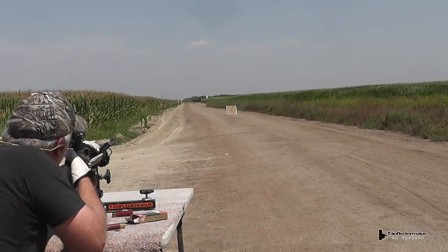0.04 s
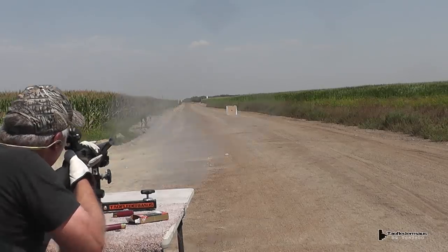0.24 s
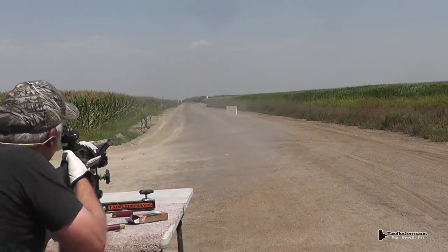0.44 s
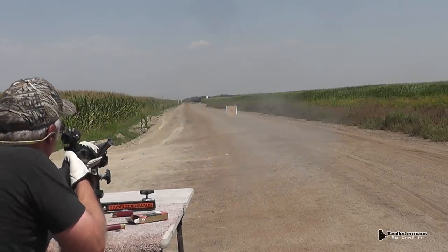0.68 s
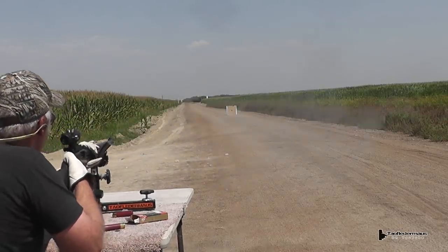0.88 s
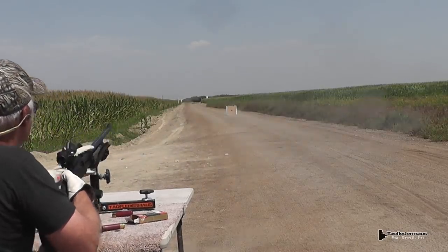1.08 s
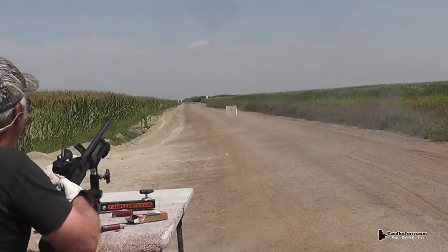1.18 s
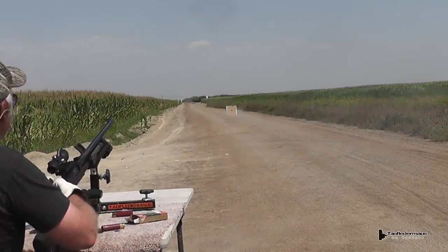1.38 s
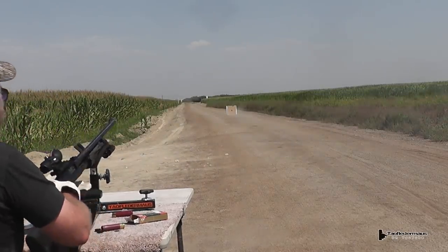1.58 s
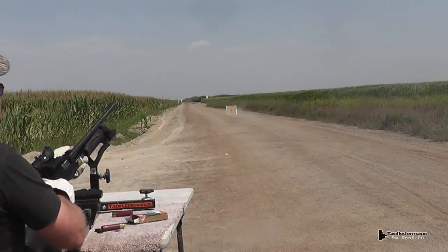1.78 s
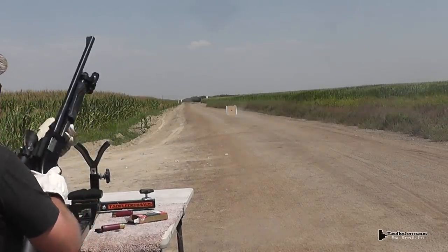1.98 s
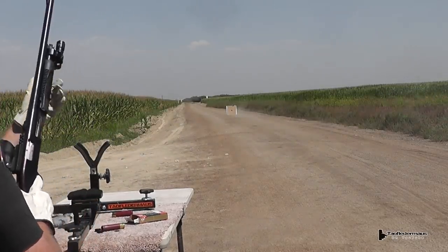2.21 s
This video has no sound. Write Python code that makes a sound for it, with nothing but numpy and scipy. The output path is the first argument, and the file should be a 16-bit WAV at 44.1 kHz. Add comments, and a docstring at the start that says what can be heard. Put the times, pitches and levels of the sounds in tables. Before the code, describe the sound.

After a brief quiet field hush, one violent gunshot bursts near the stereo microphones, scatters hiss and echoes over open farmland, fades as a dull roll, and ends with ringing action clacks and short gritty slides.

```python
"""Shotgun on a field road

A shotgun is fired once from a bench on a dirt road between fields, close to a stereo microphone pair.
The hammer knocks, crackle and a pressure thump follow, near things scatter clicks and two slaps return.
Shaped noise rolls home from ever farther away, duller as the air eats the treble; leaves scatter a hiss.
Then the gun is handled: ringing clacks and gritty slides, over a faint insect band and field hush."""
import sys
import numpy as np
from scipy import signal
from scipy.fft import rfft, irfft
from scipy.io import wavfile
from scipy.ndimage import uniform_filter1d

SR = 44100
rng = np.random.default_rng(int(sys.argv[2]) if len(sys.argv) > 2 else 0)


def dump(signal):
    """Clip the signal to [-1, 1] and save it as 16-bit WAV at the path in sys.argv[1]."""
    limited = np.clip(np.atleast_2d(signal).T, -1, 1)
    pcm = np.round(limited * 32767).astype(np.int16)
    wavfile.write(sys.argv[1], SR, pcm)


N = 99225  # samples

# Field hush, steady: pitch_hz, density_db (per Hz, relative)
HUSH_COLOUR = [(18, -43), (30, -36), (53, -18), (112, -2.5), (259, -3.5), (384, -13.5), (702, -17.5),
               (780, -7.5), (962, -21), (1320, -20.5), (3580, -34.5), (5740, -29), (6550, -29.5),
               (14800, -40), (16000, -48)]
# Stereo width of the hush: pitch_hz, side_minus_mid_db
HUSH_WIDTH = [(60, 5.5), (180, -3), (550, 1), (1650, -1.5), (4970, -42), (15000, 4)]
HUSH_DB = -49
INSECT_HZ, INSECT_HALF_WIDTH_HZ, INSECT_DB = 5750, 170, -72.5

# Hammer fall, then gun parts knocking: start_s, level_db (before CLACK_TRIM_DB), body_pitch_hz,
# steel_db (before STEEL_LIFT_DB), ring (multiple of the decay times)
CLACK_EVENTS = [(0.2017, -23, 1470, -16, 1), (1.038, -52, 900, 6, .15), (1.159, -56, 900, 3, 0.1),
                (1.179, -55, 900, 11, 0.13), (1.428, -41, 1320, -14, 0.66), (1.655, -52, 1600, 3, 0.28),
                (1.72, -40, 1410, -7, 0.6), (1.7235, -43, 1490, -6, 0.7), (1.736, -40, 1440, -10, .6),
                (1.746, -23.5, 975, -11.5, 1.1), (2.1408, -40.5, 1000, -14, 1),
                (2.174, -27, 2140, -12, 0.23)]
# Steel modes: pitch_hz, level_db (relative), t60_s (at ring 1)
STEEL_MODES = [(3100, -4, .006), (4600, 0, .007), (5700, -1, .007), (7200, -5, .005), (8600, 1, .006),
               (10000, -1, .005), (12500, -8, .003)]
CLACK_TRIM_DB, STEEL_LIFT_DB = -1, 9
BODY_T60_S, RATTLE_S = .022, .0028  # at ring 1

# Muzzle blast and its slap echoes: start_s, crackle_length_s, crackle_db, thump_db,
# dip_length_s, rebound (scale of the pressure rise after the dip)
BLAST_EVENTS = [(.2105, .0053, -11, -5.5, .0034, 1.5), (.338, .002, -21, -22, .0012, .8),
                (.4408, .0016, -13.5, -8, .0017, .55)]
# Crackle spectrum: pitch_hz, density_db (per Hz, relative)
CRACKLE_COLOUR = [(290, -42), (500, 4.5), (1510, -7.5), (2770, -32.5), (4730, -7), (10700, -6),
                  (13800, -15), (16000, -21)]
# Stereo width of the crackle: pitch_hz, side_minus_mid_db
CRACKLE_WIDTH = [(60, -14), (240, -9), (950, -4.5), (3770, -10.5), (15000, -21.5)]
THUMP_RIGHT_LAG_S, THUMP_LEFT_MINUS_RIGHT_DB = .0003, -0.5
REBOUND_RISE_DIPS, REBOUND_FADE_S = .17, .0017  # rise in dip lengths

# Treble scattered by leaves: time_s, level_db
HISS_LEVEL = [(.2156, -15.5), (.222, -23), (.25, -25), (.294, -36), (.332, -28.5), (.336, -30.5),
              (.366, -25), (.394, -30), (.415, -24), (.44, -24.5), (.452, -32.5), (.478, -40.5),
              (.5, -37.5), (.572, -41.5), (.666, -40), (.73, -44), (.752, -40), (.78, -44), (.85, -46),
              (.93, -55.5), (1.05, -56), (1.2, -61.5), (1.37, -65), (1.45, -63), (1.75, -69)]
# Leaf hiss spectrum: pitch_hz, density_db (per Hz, relative)
HISS_SPECTRUM = [(1060, -19), (1800, -1.5), (2430, -18.5), (3000, -7.5), (3510, -10.5), (4570, -4.5),
                 (5960, -9), (8830, -7.5), (13100, -16), (16000, -29)]
# Stereo width of the hiss: pitch_hz, side_minus_mid_db
HISS_WIDTH = [(60, -8), (150, -12), (380, -10), (950, -4), (2380, -16), (5980, -23), (15000, 0)]
# Colour drift of the hiss: pitch_hz, loss_db_per_s (relative to the other pitches)
HISS_FADE = [(2000, -10), (4500, -12), (8000, 5.5), (12000, 26.5), (16000, 70)]

# Scatter off bench, ground and crop edge: time_s, level_db
NEAR_LEVEL = [(.216, -16), (.236, -14.5), (.249, -15.5), (.252, -20), (.26, -21), (.266, -28), (.285, -40)]
# Near scatter spectrum: pitch_hz, density_db (per Hz, relative)
NEAR_SPECTRUM = [(35, -32), (60, -1.5), (474, -1), (649, -0.5), (948, -2.5), (1160, -11.5), (1550, -6.5),
                 (1700, -15), (2600, -24), (3380, -57), (5720, -120)]
NEAR_START_S, NEAR_RISE_S, NEAR_CLICKS_PER_S = .2205, .0029, 2700
NEAR_SPREAD_DB, NEAR_SHARED_POWER, NEAR_LEFT_MINUS_RIGHT_DB = 1, .42, 2.5

# Returning roll, low part: time_s, level_db
ROLL_LEVEL = [(.26, -29), (.292, -36.5), (.35, -32.5), (.39, -32.5), (.43, -28.5), (.47, -27.5),
              (.55, -22.5), (.62, -24.5), (.76, -23.5), (.93, -25), (1.1, -28.5), (1.2, -32), (1.34, -32),
              (1.4, -36.5), (1.6, -40.5), (1.8, -42), (2, -48), (2.25, -52)]
# Low roll spectrum: pitch_hz, density_db (per Hz, relative)
ROLL_SPECTRUM = [(29, -41), (50, -53), (225, -10), (411, -4.5), (546, -6), (690, -2.5), (950, -4.5),
                 (1240, -33), (2090, -120)]
# Stereo width of both roll parts: pitch_hz, side_minus_mid_db
ROLL_WIDTH = [(60, 19.5), (180, -19.5), (550, -13), (1650, -7), (4970, -16), (15000, -11)]
# Colour drift of the low roll: pitch_hz, loss_db_per_s (relative to the other pitches)
ROLL_FADE = [(60, 16), (150, -5.5), (280, 6), (600, 20.5), (1000, 45.5)]
# Returning roll, upper part: time_s, level_db
UPPER_LEVEL = [(.26, -42), (.29, -37.5), (.36, -34), (.395, -34.5), (.41, -24), (.44, -21.5), (.455, -31),
               (.5, -31), (.545, -27.5), (.6, -31.5), (.7, -38.5), (.8, -39.5), (.94, -50.5), (1.1, -53.5),
               (1.3, -61), (1.39, -61), (1.43, -58), (1.5, -63), (1.7, -71)]
# Upper roll spectrum: pitch_hz, density_db (per Hz, relative)
UPPER_SPECTRUM = [(500, -27.5), (750, -7.5), (1000, 2.7), (1400, 4), (1800, -14), (2400, -18), (3100, -28),
                  (5000, -58)]
# Colour drift of the upper roll: pitch_hz, loss_db_per_s (relative to the other pitches)
UPPER_FADE = [(800, 2.5), (1100, 9), (1500, 20), (2400, 2.5)]
LOSS_START_S, LOSS_SPAN_S = .37, 1.4  # the colour drifts only within this span

# Faint high rustle as the gun is lifted: start_s, length_s, level_db (before the arch)
RUSTLE_EVENT = (0.85, 0.44, -63.5)
# Rustle spectrum: pitch_hz, density_db (per Hz, relative)
RUSTLE_SPECTRUM = [(4000, -20), (7000, 4), (11000, 0.1), (14500, -7), (16000, -15)]
# Gun parts sliding: start_s, length_s, level_db (before the arch)
SLIDE_EVENTS = [(1.707, 0.071, -51), (1.761, .07, -57), (2.104, 0.069, -59.5), (2.161, 0.041, -50.5)]
# Slide spectrum: pitch_hz, density_db (per Hz, relative)
SLIDE_SPECTRUM = [(590, -33), (1000, 0.5), (2100, -11), (3300, -15.5), (4620, -9.5), (10800, -15),
                  (14900, -30), (16000, -41)]
GRIT_DB = 2.5

# Balance of the microphone pair: pitch_hz, left_minus_right_db
MIC_BALANCE = [(60, 0.0), (180, -1.5), (550, 1.0), (1650, 0), (4970, -1), (15000, 1)]
LOW_CUT_HZ, BAND_EDGE_HZ = 20, 16100


def amp(db):
    """Turns decibels into a linear gain."""
    return 10 ** (np.asarray(db) / 20)


def evened(x):
    """Scales a sound to unit RMS level."""
    return x / np.sqrt(np.mean(x ** 2) + 1e-20)


def read(points, hz):
    """Reads a pitch table between its points on a log pitch scale."""
    pitch_hz, value = np.transpose(points)
    return np.interp(np.log(hz + 1), np.log(pitch_hz + 1), value)


def level(curve):
    """Gain per sample from a dB curve, at -120 dB outside it."""
    time_s, level_db = np.transpose(curve)
    return amp(np.interp(np.arange(N) / SR, time_s, level_db, -120, -120))


def left_right(difference_db):
    """Splits a left-minus-right difference evenly into two channel gains."""
    return amp(difference_db * np.array([[.5], [-.5]]))


def add(mix, start_s, sound):
    """Lays a sound into the mix from its start time."""
    part = mix[..., round(start_s * SR):][..., :sound.shape[-1]]
    part += sound[..., :part.shape[-1]]


def colour(x, points):
    """Filters to a spectrum and evens the level."""
    hz = np.fft.rfftfreq(x.shape[-1], 1 / SR)
    return evened(irfft(rfft(x) * amp(read(points, hz)), x.shape[-1]))


def noise(spectrum, width, fade, patchy_db, size):
    """Unit-level stereo noise with drifting patches, its colour changing after the shot."""
    hop = size // 4
    frames, hz = N // hop + 5, np.fft.rfftfreq(size, 1 / SR)
    a, b, c, d, patches = rng.standard_normal((frames, len(hz), 5)).T
    patches = uniform_filter1d(patches, size // 64, 0)  # smooth across pitch
    patches = evened(uniform_filter1d(patches, 2048 // size + 2, 1))  # and across time
    since_s = np.clip(np.arange(frames) * hop / SR - LOSS_START_S, 0, LOSS_SPAN_S)
    shape = amp(read(spectrum, hz)[:, None] - read(fade, hz)[:, None] * since_s)
    shape = shape / np.sqrt((shape ** 2).mean(0))  # only the balance of pitches drifts
    shape = shape * amp(patchy_db * patches)
    mid = a + 1j * b
    side = amp(read(width, hz))[:, None] * (c + 1j * d)
    spectra = np.array([mid + side, mid - side]) * shape
    return evened(signal.istft(spectra, nperseg=size, noverlap=size - hop)[1][:, :N])


def hush():
    """Steady low-weighted noise of the open field."""
    flat = [(20, 0.016), (20000, 0)]  # almost no colour drift
    return noise(HUSH_COLOUR, HUSH_WIDTH, flat, patchy_db=1.0, size=1024) * amp(HUSH_DB)


def insects():
    """Chirring as narrow-band noise, whose level wavers by itself, almost alike at each ear."""
    band = [INSECT_HZ - INSECT_HALF_WIDTH_HZ, INSECT_HZ + INSECT_HALF_WIDTH_HZ]
    sos = signal.butter(2, band, "bandpass", fs=SR, output="sos")
    x = rng.standard_normal((3, N))
    return amp(INSECT_DB) * evened(signal.sosfilt(sos, x[0] + 0.058 * x[1:]))


def clack(start_s, level_db, body_hz, steel_db, ring):
    """A knock rings two decaying body tones; a short noise rattle excites the steel modes."""
    t = np.arange(0, .05, 1 / SR)
    u = t / max(ring, .05)  # longer ring stretches every decay
    rattle = rng.standard_normal(len(t)) * np.exp(-u / RATTLE_S)
    tones = np.sin(2 * np.pi * body_hz * t) + 0.51 * np.sin(2 * np.pi * 1.55 * body_hz * t)
    body = np.minimum(t / 0.00043, 1) * amp(-60 * u / BODY_T60_S) * tones
    steel = sum(amp(db - 60 * u / t60_s) * np.sin(2 * np.pi * hz * t) for hz, db, t60_s in STEEL_MODES)
    steel = signal.fftconvolve(steel, rattle)[:len(t)]
    steel = amp(steel_db + STEEL_LIFT_DB) * steel / abs(steel).max()
    return start_s, amp(level_db + CLACK_TRIM_DB) * (body + steel)


def blast(start_s, crackle_s, crackle_db, thump_db, dip_s, rebound):
    """A burst of crackle, then one low pressure dip and its fading rebound."""
    t = np.arange(0, .05, 1 / SR)
    mid, side = rng.standard_normal((2, len(t)))
    hz = np.fft.rfftfreq(len(t), 1 / SR)
    side = irfft(rfft(side) * amp(read(CRACKLE_WIDTH, hz)), len(t))
    crackle = colour(np.array([mid + side, mid - side]), CRACKLE_COLOUR)
    crackle = crackle * (t < crackle_s) * np.minimum(t / .0003, 1)
    lag_s = np.array([[0], [THUMP_RIGHT_LAG_S]])
    u = np.maximum(t - crackle_s - lag_s, 0) / dip_s  # time in dip lengths
    after = np.maximum(u - 1, 0)
    dip = -np.sin(np.pi * np.minimum(u, 1))
    rise = 1 - np.exp(-after / REBOUND_RISE_DIPS)
    thump = dip + rebound * rise * np.exp(-after * dip_s / REBOUND_FADE_S)
    thump = amp(thump_db) * left_right(THUMP_LEFT_MINUS_RIGHT_DB) * thump
    return start_s, amp(crackle_db) * crackle + thump


def leaf_hiss():
    """Treble scattered by leaves: patchy noise under a level curve, its colour drifting."""
    return noise(HISS_SPECTRUM, HISS_WIDTH, HISS_FADE, patchy_db=2.5, size=256) * level(HISS_LEVEL)


def near_scatter():
    """Nearby surfaces return dense random clicks, partly shared between the ears."""
    strength_db = NEAR_SPREAD_DB * np.minimum(rng.exponential(1, (3, N)), 2.5)
    present = rng.random((3, N)) < NEAR_CLICKS_PER_S / SR
    clicks = rng.standard_normal((3, N)) * amp(strength_db) * present
    mix = np.sqrt(NEAR_SHARED_POWER) * clicks[0] + np.sqrt(1 - NEAR_SHARED_POWER) * clicks[1:]
    onset = np.clip((np.arange(N) / SR - NEAR_START_S) / NEAR_RISE_S, 0, 1)
    balance = left_right(NEAR_LEFT_MINUS_RIGHT_DB)
    return colour(mix, NEAR_SPECTRUM) * balance * level(NEAR_LEVEL) * onset


def rolling_echo():
    """Distant returns merge into low and upper noise, each with its own level and colour drift."""
    low = noise(ROLL_SPECTRUM, ROLL_WIDTH, ROLL_FADE, patchy_db=0.64, size=1024) * level(ROLL_LEVEL)
    upper = noise(UPPER_SPECTRUM, ROLL_WIDTH, UPPER_FADE, patchy_db=2.0, size=512) * level(UPPER_LEVEL)
    return low + upper


def slide(start_s, length_s, level_db, spectrum):
    """Friction as gritty noise under a soft arch, a little different at each ear."""
    n = round(length_s * SR)
    grit = rng.standard_normal((3, n)) * amp(GRIT_DB * np.minimum(rng.exponential(1, n), 3))
    scrape = colour(grit[0] + 0.04 * grit[1:], spectrum)
    return start_s, amp(level_db) * scrape * np.sqrt(np.hanning(n))


def scene():
    """Sums the field, the shot with its echoes and the gun handling."""
    mix, clacks = np.zeros((2, N)), np.zeros(N)
    for row in CLACK_EVENTS:
        add(clacks, *clack(*row))
    for row in BLAST_EVENTS:
        add(mix, *blast(*row))
    add(mix, *slide(*RUSTLE_EVENT, RUSTLE_SPECTRUM))
    for row in SLIDE_EVENTS:
        add(mix, *slide(*row, SLIDE_SPECTRUM))
    mix += clacks * left_right(1.4)  # clacks sit a little left
    return mix + hush() + insects() + leaf_hiss() + near_scatter() + rolling_echo()


def record(dry):
    """Microphone pair with a slight balance by pitch, low cut, soft overload, then the band limit."""
    padded = N + 999
    balance = left_right(read(MIC_BALANCE, np.fft.rfftfreq(padded, 1 / SR)))
    heard = irfft(rfft(dry, padded) * balance, padded)[:, :N]
    cut = signal.lfilter(*signal.butter(2, LOW_CUT_HZ, "highpass", fs=SR), heard)
    soft = 1.316 * np.tanh(cut / 1.288)
    band_limit = signal.firwin(511, BAND_EDGE_HZ, window=("kaiser", 9), fs=SR)
    return signal.oaconvolve(soft, band_limit[None], "same")


dry = scene()
out = record(dry)
dump(out)
```